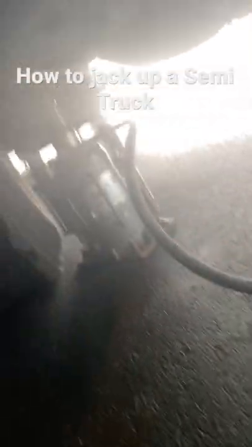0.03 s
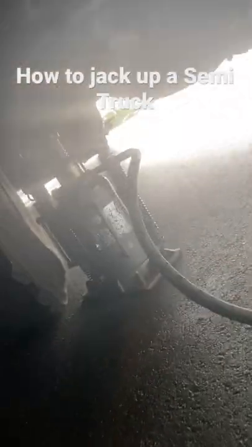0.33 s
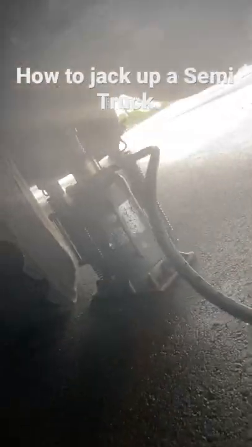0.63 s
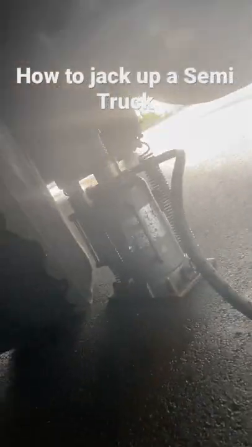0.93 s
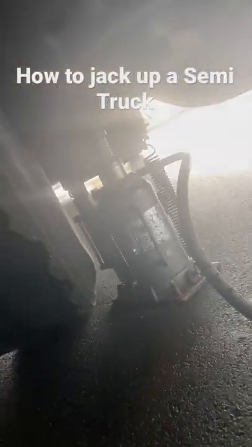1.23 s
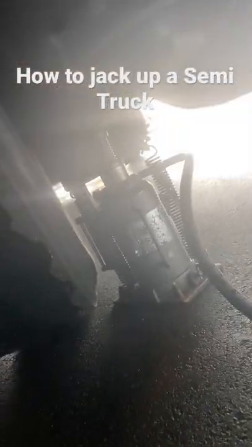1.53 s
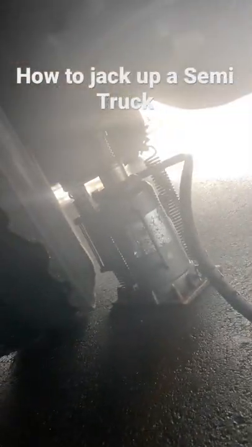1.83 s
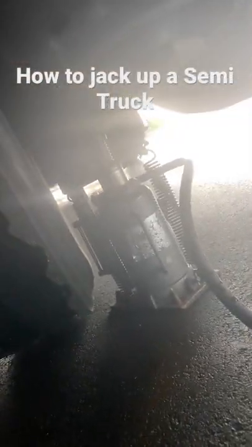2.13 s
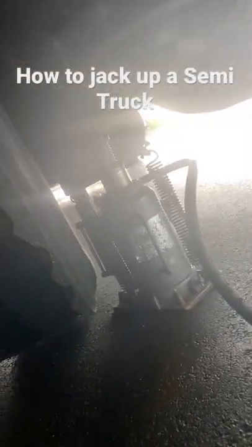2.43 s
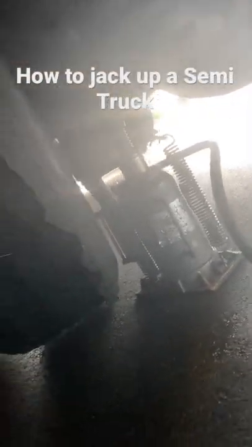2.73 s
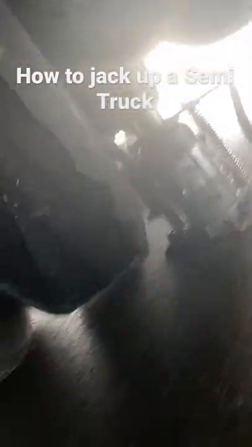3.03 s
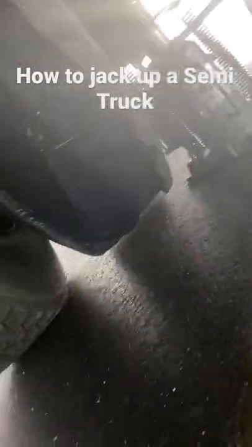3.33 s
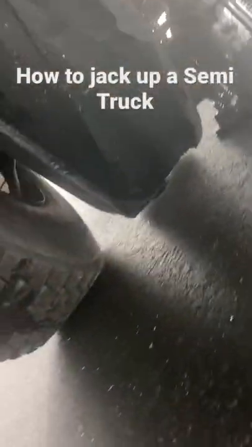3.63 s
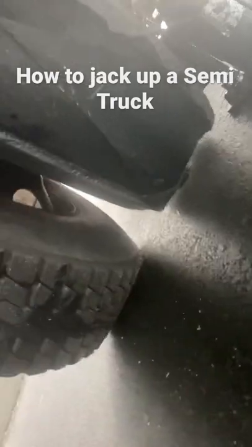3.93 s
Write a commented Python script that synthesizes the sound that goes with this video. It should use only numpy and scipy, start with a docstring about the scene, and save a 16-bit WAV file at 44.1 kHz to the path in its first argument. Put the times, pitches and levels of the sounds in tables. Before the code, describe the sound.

Close up beneath a truck, a pneumatic jack chatters nonstop with rapid blasts of air, thumps and ringing steel knocks. It slows very slightly as a low rumble and hum grow underneath, and one hollow clunk comes late.

```python
"""An air-powered bottle jack pumps under a truck, about eleven strokes a second, slowing under the load.
Each stroke is a blast of exhaust air with a low thump, then the knock and tick of the returning piston
and the hiss of the cylinder refilling. The steel body rings, and low notes hum after each knock.
A few strokes open with a sharper spit, one hollow clunk comes late, and a low rumble swells beneath."""
import sys
import numpy as np
from scipy.fft import rfft, irfft
from scipy.io import wavfile

SR = 44100
rng = np.random.default_rng(int(sys.argv[2]) if len(sys.argv) > 2 else 0)


def wav_out(sig):
    """Save sig, one row per channel (or a flat mono array), as 16-bit PCM at SR to the path in sys.argv[1]."""
    wavfile.write(sys.argv[1], SR, np.round(np.clip(np.atleast_2d(sig).T, -1, 1) * 32767).astype(np.int16))


N = 176400
T, HZ = np.arange(N) / SR, np.arange(N // 2 + 1) * SR / N

# how fast the jack pumps: (time [s], speed [strokes/s])
PUMP_SPEED = [(0, 11.772), (.4, 11.744), (1.0, 11.552), (1.4, 11.516), (1.95, 11.307), (2.35, 11.375),
              (3.0, 11.178), (4.0, 11.181)]
# the tone of each background noise: (frequency [Hz], relative level [dB])
RUMBLE_COLOUR = [(20, -24), (42, -9), (78, 0), (125, -5), (260, -1), (330, -7), (400, -6), (550, -13),
                 (750, -21), (1500, -23), (3000, -22), (8000, -24), (15000, -39)]
SWELL_COLOUR = [(20, -28), (34, -8), (45, -1), (62, -4), (82, 2), (105, -5), (150, -15), (400, -40),
                (2000, -70)]
DRONE_COLOUR = [(90, -30), (132, -12), (148, 5.5), (172, -5), (210, -4.5), (270, -4), (325, -11), (385, -3),
                (450, -8), (560, -19), (800, -34), (3000, -60)]
# how loud each one is: (time [s], level [dB])
RUMBLE_LEVEL = [(0, -31), (1.8, -31), (2.5, -29.5), (4, -31.5)]
SWELL_LEVEL = [(0, -45), (2.0, -42), (2.3, -28.5), (2.52, -24), (2.7, -32), (3.3, -35), (4, -34)]
DRONE_LEVEL = [(0, -42), (1.5, -38), (2.2, -31), (2.6, -28.5), (3.3, -27.7), (4, -27.3)]
# the piston's blows weaken as the microphone moves away: (time [s], level change [dB])
BLOW_LEVEL = [(0, 1), (1.0, .5), (2.0, -.2), (3.0, -1.2), (4.0, -2.4)]
# the notes of each struck part: (frequency [Hz], level [dB], time to fade by 60 dB [s])
STEEL_NOTES = [(1060, -41, .08), (1130, -41, .09), (1270, -40, .1), (1400, -44, .1), (1510, -40.5, .18),
               (1722, -40.5, .15), (1900, -39.5, .13), (2045, -36, .07), (2450, -38, .07), (2990, -41, .08),
               (3250, -37.5, .13), (3640, -36, .07), (4460, -36, .06), (4922, -39, .14)]
VALVE_NOTES = [(7450, -22, .025), (7800, -25, .025), (8900, -32, .02)]
CYLINDER_NOTES = [(515, -25.5, .05), (638, -34, .06)]
# low, humming notes that follow each knock: (frequency [Hz], level [dB], time to fade by 60 dB [s])
LOW_NOTES = [(80, -24.5, .24), (147, -26.5, .28), (207, -26.5, .22), (236, -29, .24), (261, -27.5, .18),
             (358, -36, .14), (396, -35.5, .1)]
# the tone of each puff of air: (frequency [Hz], relative level [dB])
RATTLE_COLOUR = [(400, 2), (900, 0), (2000, 0), (3500, -5), (5500, -2), (7500, 0), (10000, -7),
                 (15000, -12)]
REFILL_COLOUR = [(700, -13), (2000, -12), (4000, -10), (5200, -.5), (7500, 0), (9500, -10), (10700, -10),
                 (11800, -5), (14000, -14), (15500, -14)]
BLAST_COLOUR = [(200, 2), (500, 4), (750, -4), (1050, -3), (1600, -6), (2100, -1), (3000, -4.5), (4700, 2),
                (6800, -3), (8500, -1.5), (10500, 1.5), (15500, -3.5)]
EDGE_COLOUR = [(2500, -30), (3600, -6), (4400, 0), (5500, -2), (6500, -20), (10000, -40)]
EXHAUST_COLOUR = [(200, 0), (700, -5), (850, -1.5), (1100, -2.7), (1600, -4.3), (2100, -.7), (2950, -1.5),
                  (3430, -3), (3650, 0), (4100, -2.5), (5400, .5), (6600, 0), (7800, 1.5), (9700, -1.2),
                  (12500, -3), (15500, -4.5)]
# the blast's bright edge, strongest with the microphone swung aside: (time [s], level change [dB])
EDGE_LEVEL = [(0, -3), (1.2, -8), (2.5, -6), (3.0, 0), (3.3, 1), (4, -4)]
# sharper spits of air: (time [s], level [dB])
SPITS = [(.3855, -19), (.8975, -17.5), (1.8560, -21), (2.0320, -17), (2.1210, -17.5), (2.6485, -20),
         (3.0050, -18), (3.8085, -19.5)]
# echoes off the pavement and the truck's underside: (delay [s], gain [ratio])
ECHOES = [(.00163, .16), (.00305, .11), (.00388, .12), (.00583, .11)]
# how wide noise spreads between left and right: (frequency [Hz], sides against middle [dB])
STEREO_WIDTH = [(60, -24), (200, -15), (600, -3), (1100, -9), (1900, -13), (2700, -5), (4500, -5),
                (6500, -13), (7400, -15), (10000, -10), (13500, -14), (15500, -10)]
# how left and right differ in level: (frequency [Hz], left minus right [dB])
STEREO_BALANCE = [(60, -.3), (110, -.6), (200, -2), (380, -3.3), (700, -5), (1300, -.5), (4400, -.6),
                  (8000, 0)]
# how far the left wave runs ahead of the right: (frequency [Hz], phase lead [rad])
STEREO_PHASE = [(0, 0), (2100, 0), (2800, 1.3), (4400, 1), (5000, .1), (5700, .9), (6500, 2.75),
                (7200, 3.14), (8100, 3.5), (9800, 6.15), (11100, 6.35), (12700, 9.1), (14200, 9.7),
                (15500, 12), (16500, 13.5)]


def from_db(db):
    """Turn decibels into a gain to multiply by."""
    return 10 ** (np.asarray(db) / 20)


def gain_curve(points):
    """Gain at every frequency from (frequency [Hz], level [dB]) points."""
    hz, db = np.transpose(points)
    return from_db(np.interp(np.log(HZ + 1), np.log(hz), db))


def level(points):
    """Gain at every moment from (time [s], level [dB]) points."""
    return from_db(np.interp(T, *np.transpose(points)))


def noise(colour):
    """Stereo noise with the given tone, partly different in each ear."""
    middle, side = rfft(rng.standard_normal((2, N)))
    width = gain_curve(STEREO_WIDTH)
    left_right = (middle + side * width * [[1], [-1]]) / np.sqrt(1 + width ** 2)
    sound = irfft(left_right * gain_curve(colour), N)
    return sound / sound.std()


def pulse(age, rise_s, decay_s):
    """The loudness of one hit: a rounded rise, then a fade."""
    age = np.maximum(age, 0)
    return (1 - np.exp(-(age / rise_s) ** 2)) * np.exp(-age / decay_s)


def stroke_times(first_full_s=.0437, jitter_s=.0003):
    """Slightly uneven stroke starts. The pump is already running, so we first hear the piston return."""
    when, speed = np.transpose(PUMP_SPEED)
    times = [first_full_s - 1 / speed[0]]
    while times[-1] < N / SR:
        times.append(times[-1] + 1 / np.interp(times[-1], when, speed))
    return np.array(times) + jitter_s * rng.standard_normal(len(times))


def play(times, shape, spread_db=.5, length_s=.25):
    """Play shape(age) at each time, a little louder or softer at random."""
    out = np.zeros(N)
    for start, luck in zip(times, rng.standard_normal(len(times))):
        span = slice(*np.searchsorted(T, [start, start + length_s]))
        out[span] += from_db(spread_db * luck) * shape(T[span] - start)
    return out


def puff(times, colour, db, rise_s, hold_s, decay_s):
    """Rushing air: bursts of noise that rise, hold and fade."""
    def shape(age):
        return np.minimum(age / rise_s, 1) * np.exp(-np.maximum(age - rise_s - hold_s, 0) / decay_s)
    return from_db(db) * play(times, shape) * noise(colour)


def blow(times, db, start_hz, end_hz, fall_s, rise_s, decay_s):
    """Dull piston blows whose pitch drops as they die away."""
    def shape(age):
        cycles = end_hz * age + (start_hz - end_hz) * fall_s * (1 - np.exp(-age / fall_s))
        detune = 1 + .015 * rng.uniform(-1, 1)
        return np.sin(2 * np.pi * cycles * detune) * pulse(age, rise_s, decay_s)
    return level(BLOW_LEVEL) * from_db(db) * play(times, shape)


def ring(times, notes, spread_db):
    """Notes that ring and fade, each with a new strength at every hit."""
    out = np.zeros(N)
    for hz, db, fade_s in notes:
        out += play(times, lambda t: from_db(db - 60 * t / fade_s) * np.sin(2 * np.pi * hz * t), spread_db)
    return out


def background():
    """A low rumble, with a deeper swell and a boxy drone that grow in the second half."""
    rumble = level(RUMBLE_LEVEL) * noise(RUMBLE_COLOUR)
    swell = level(SWELL_LEVEL) * noise(SWELL_COLOUR)
    drone = level(DRONE_LEVEL) * noise(DRONE_COLOUR)
    return rumble + swell + drone


def air_rattle(strokes):
    """A faint, sudden puff of air as the piston returns."""
    return puff(strokes + .0415, RATTLE_COLOUR, db=-31.5, rise_s=.001, hold_s=.002, decay_s=.016)


def piston_knock(strokes, echo_s=.0107, echo_db=-13):
    """The returning piston knocks, and the sound bounces back off the truck."""
    knock = blow(strokes + .04276, db=-10.1, start_hz=652, end_hz=78,
                 fall_s=.00345, rise_s=.0018, decay_s=.0066)
    return knock + from_db(echo_db) * np.interp(T - echo_s, T, knock, left=0)


def metal_ring(strokes, push_s=.002, return_s=.044, spread_db=2.5):
    """The piston strikes the steel body at both ends of its travel; the valve ticks on the return."""
    push = ring(strokes + push_s, STEEL_NOTES, spread_db)
    back = from_db(-5) * ring(strokes + return_s, STEEL_NOTES, spread_db)
    tick = ring(strokes + return_s, VALVE_NOTES, spread_db)
    return push + back + tick


def hollow_ring(strokes):
    """The returning piston rings the hollow cylinder, and low notes hum after each knock."""
    cylinder = ring(strokes + .0447, CYLINDER_NOTES, spread_db=.5)
    hum = ring(strokes + .0482, LOW_NOTES, spread_db=.5)
    return cylinder + hum


def refill(strokes):
    """Air hisses back into the cylinder."""
    return puff(strokes + .049, REFILL_COLOUR, db=-26, rise_s=.009, hold_s=.018, decay_s=.012)


def exhaust(strokes):
    """Used air escapes: a short blast with a bright edge, then a longer hiss."""
    blast = puff(strokes - .0013, BLAST_COLOUR, db=-18.4, rise_s=.0042, hold_s=.0012, decay_s=.0065)
    edge = puff(strokes + .0004, EDGE_COLOUR, db=-22.5, rise_s=.002, hold_s=.003, decay_s=.006)
    hiss = puff(strokes + .0005, EXHAUST_COLOUR, db=-21.8, rise_s=.005, hold_s=.013, decay_s=.031)
    return blast + level(EDGE_LEVEL) * edge + hiss


def piston_thump(strokes):
    """The piston's low thump as a stroke begins; its wave swings the opposite way to the knock's."""
    return -blow(strokes + .0038, db=-8.2, start_hz=535, end_hz=57.5,
                 fall_s=.00325, rise_s=.0048, decay_s=.0155)


def spits():
    """Now and then the exhaust opens with a sharper spit."""
    loudness = sum(from_db(db) * pulse(T - start, rise_s=.0015, decay_s=.0035) for start, db in SPITS)
    return loudness * noise(BLAST_COLOUR)


def clunk(start_s=3.3235, db=-5.5, hz=370):
    """One short, hollow clunk."""
    age = T - start_s
    return from_db(db) * pulse(age, rise_s=.004, decay_s=.005) * np.sin(2 * np.pi * hz * age)


def sputter(spread_db=.8, changes_per_s=160):
    """The air flows unevenly, so its loudness flickers."""
    times = np.arange(0, N / SR, 1 / changes_per_s)
    return from_db(spread_db * np.interp(T, times, rng.standard_normal(len(times))))


def under_truck(sound, tail_db=-6.3, fade_s=.22, dull_above_hz=4000):
    """Close echoes and a short, dull tail of sound under the truck make the hiss hollow."""
    tail = rng.standard_normal(N) * from_db(-60 * T / fade_s) * (T > ECHOES[0][0])
    space = from_db(tail_db) * rfft(tail / np.linalg.norm(tail)) / np.sqrt(1 + (HZ / dull_above_hz) ** 2)
    echoes = sum(gain * np.exp(-2j * np.pi * HZ * delay) for delay, gain in ECHOES)
    return irfft(rfft(sound) * (1 + echoes + space), N)


def scene():
    """The pump's air, blows and ringing over the rumble."""
    strokes = stroke_times()  # in seconds; each sound adds its own offset
    air = air_rattle(strokes) + refill(strokes) + exhaust(strokes) + spits()
    blows = piston_knock(strokes) + piston_thump(strokes) + clunk()
    ringing = metal_ring(strokes) + hollow_ring(strokes)
    return background() + under_truck(air * sputter()) + blows + ringing


def record(dry, low_cut_hz=32, high_cut_hz=15800):
    """Left and right differ in level and phase, widening the hiss; deep bass and top treble are cut."""
    lean = np.sqrt(gain_curve(STEREO_BALANCE))
    lead = np.interp(HZ, *np.transpose(STEREO_PHASE))
    left_right = np.array([lean, np.exp(-1j * lead) / lean])
    bass_cut = 1 / np.sqrt(1 + (low_cut_hz / (HZ + 1)) ** 10)
    treble_cut = 1 / np.sqrt(1 + (HZ / high_cut_hz) ** 600)
    return irfft(rfft(dry) * left_right * bass_cut * treble_cut, N)


dry = scene()
out = record(dry)
wav_out(out)
```